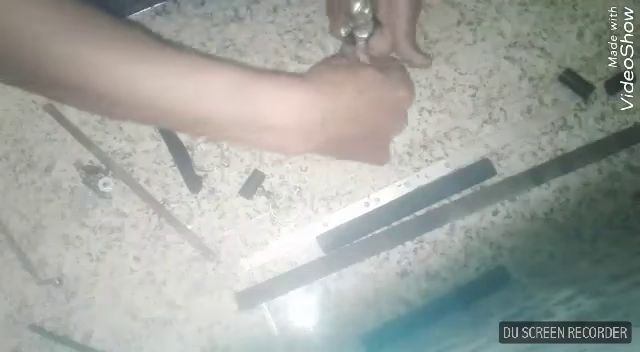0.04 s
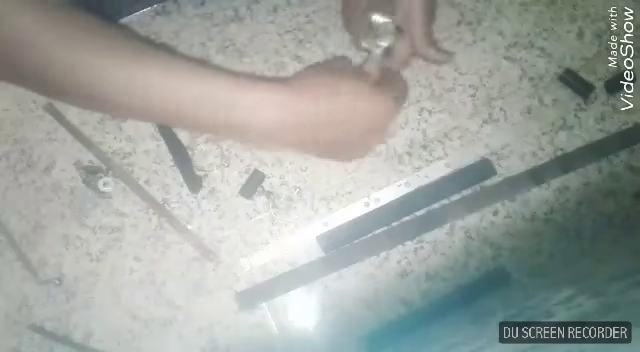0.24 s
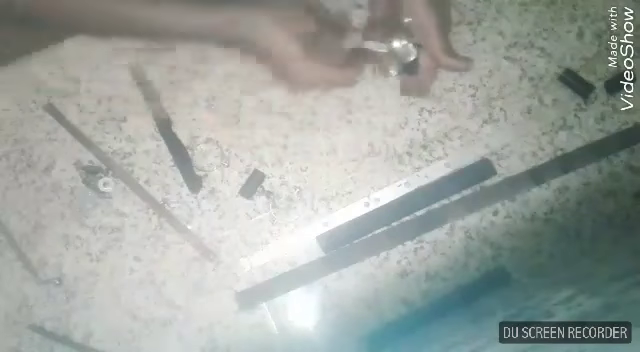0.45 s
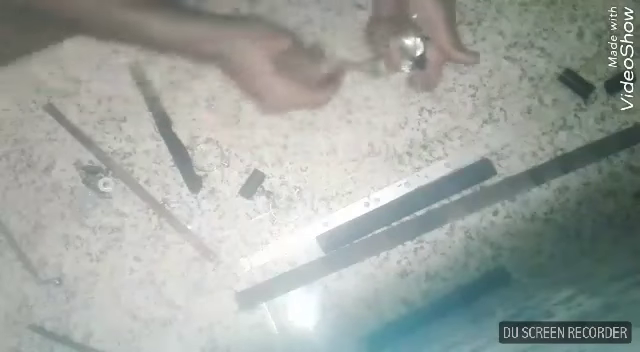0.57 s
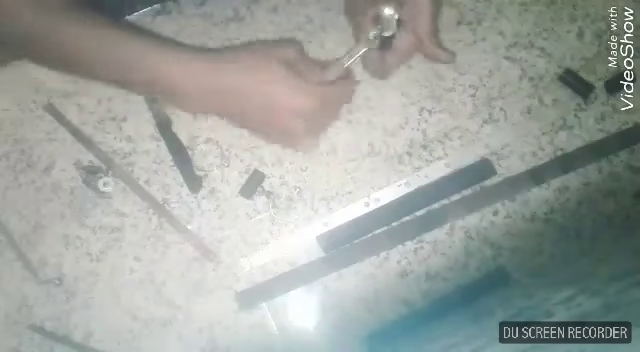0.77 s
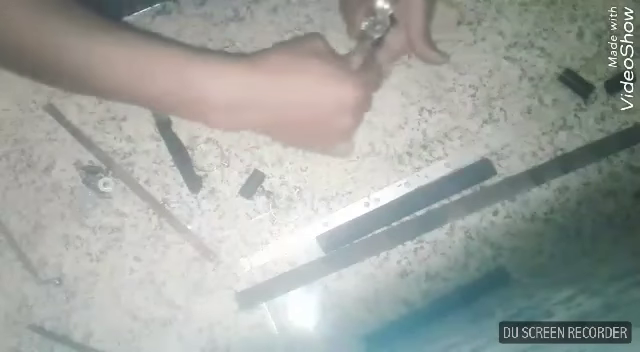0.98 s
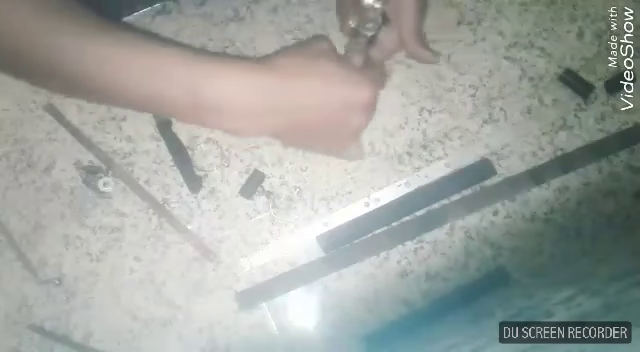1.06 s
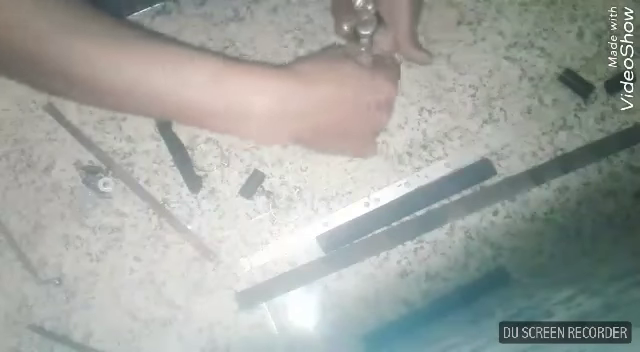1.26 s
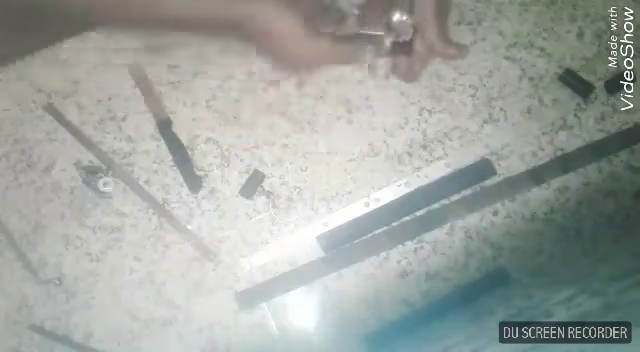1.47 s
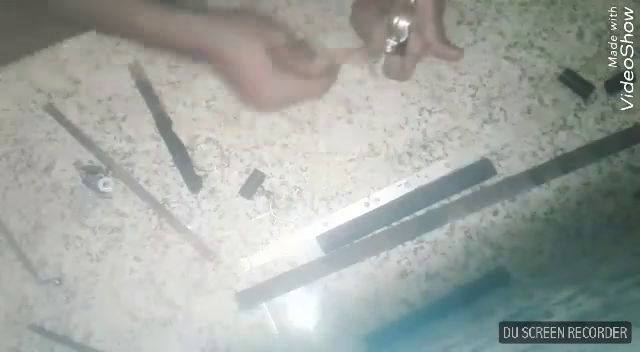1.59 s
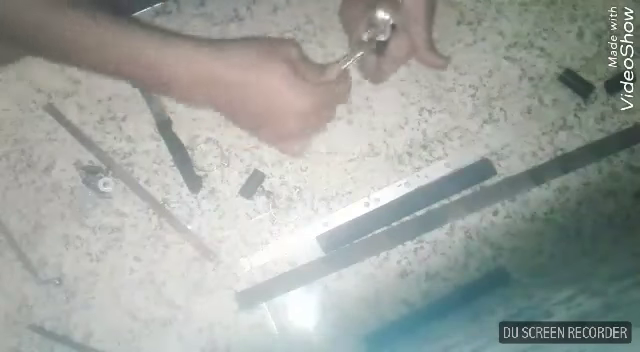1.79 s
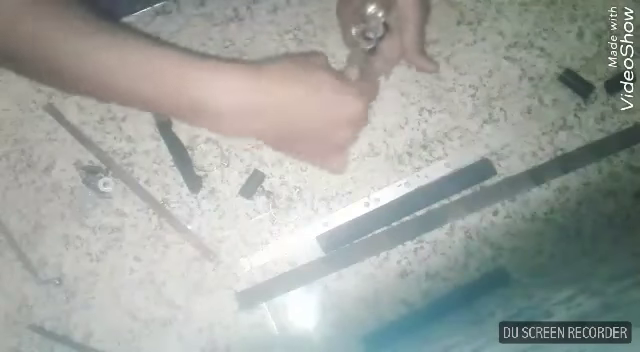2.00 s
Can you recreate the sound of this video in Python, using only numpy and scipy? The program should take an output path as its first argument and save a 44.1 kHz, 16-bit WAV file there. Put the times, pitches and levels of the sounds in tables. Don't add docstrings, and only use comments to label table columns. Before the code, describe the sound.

Steel spanner working a nut on a bracket, in a bare stone-floored room. Near-silent hiss, then two soft clicks at 0.22 and 0.28 s, a very faint tick at 0.49, a sharp bright knock at 0.78. From 1.02 to 1.35 a rough, dulling scrape with slips near 1.14-1.21; faint rub at 1.41. Click at 1.54, heaviest double clank at 1.79, light knock at 1.95. Gated phone sound clips room tails and low rumble.

```python
import sys
import numpy as np
from scipy import signal
from scipy.fft import rfft, irfft, next_fast_len
from scipy.io import wavfile
from scipy.ndimage import uniform_filter1d

SR = 44100
rng = np.random.default_rng(int(sys.argv[2]) if len(sys.argv) > 2 else 0)


def waveform_to_disk(signal):
    frames = np.transpose(np.atleast_2d(signal))
    scaled = np.clip(frames, -1, 1) * 32767
    samples = np.round(scaled).astype(np.int16)
    wavfile.write(sys.argv[1], SR, samples)


def natural_amplitude(level_db):
    exponent = np.asarray(level_db, float) / 20
    return 10 ** exponent


N = 89611
SOFT_RISE_S, SHARP_RISE_S, CLANK_RISE_S = 0.003, 0.0007, 0.0015


def unit(x):
    return x / np.sqrt(np.mean(x ** 2) + 1e-20)


def along(points, f_hz):
    f, value = np.transpose(points)
    return np.interp(np.log(f_hz + 1), np.log(f + 1), value)


def filtered(x, response):
    size = next_fast_len(len(x) + 8192)
    spectrum = rfft(x, size) * response(np.fft.rfftfreq(size, 1 / SR))
    return irfft(spectrum, size)[:len(x)]


def modes(table, f):
    total = 0
    for k, (centre, width, db) in enumerate(table):
        resonance = 1j * f * width / (centre ** 2 - f ** 2 + 1j * f * width)
        total = total + (-1) ** k * natural_amplitude(db) * resonance
    return total


# f/Hz, density/dB per Hz
CRACK_SPECTRUM = [(88, -14), (150, -18), (572, -4), (1000, -23), (1570, -1.5), (1980, -7.5), (6730, -5),
                  (7410, -3.5), (15500, -30)]


def contacts(events, mode_table, rise_s):
    fall_ratio, grain_db, level_trim_db = 1.6, 4.5, 21
    pad = SR // 50
    t = (np.arange(SR) - pad) / SR
    envelope = np.exp(np.where(t < 0, t / rise_s, -t / rise_s / fall_ratio))
    impulse = 1.0 * (t == -pad // 8 / SR)
    out = np.zeros(N + SR)
    for at_s, peak_db, crack_db, tilt_db, wet_db in events:
        grain = unit(uniform_filter1d(rng.standard_normal(SR), size=30))
        scrape = envelope * rng.standard_normal(SR) * natural_amplitude(grain_db * grain)

        def colour(f):
            crack = natural_amplitude(crack_db + along(CRACK_SPECTRUM, f))
            return (modes(mode_table, f) + crack) * natural_amplitude(tilt_db * np.log2((f + 200) / 4000))

        direct = filtered(scrape / np.linalg.norm(scrape), colour)
        blow = filtered(impulse, colour)
        start = round(at_s * SR) - pad
        out[start:start + SR] += natural_amplitude(peak_db + level_trim_db) * (direct + natural_amplitude(wet_db) * room(blow))
    return out[:N]


# f/Hz, width/Hz, level/dB.
SEAT_MODES = [(575, 54, -21), (1574, 160, 4), (3020, 310, -4), (4430, 220, 6.5), (5510, 180, -4),
              (6150, 98, -0.5), (7290, 19, 5), (7800, 180, 0), (10920, 57, -1.5), (11630, 100, -9)]
# t/s, peak level/dB, crack re modes/dB, tilt/dB per octave, room re direct/dB
SEAT_EVENTS = [
    (.2185, -23, -6.5, 0.9, 2.5),
    (.284, -27.5, -1.5, -0.5, 1.5),
    (.4928, -66.5, 3, 11.5, -3),
]


def seating():
    return contacts(SEAT_EVENTS, SEAT_MODES, SOFT_RISE_S)


LIFT_MODES = [(630, 40, -16), (1760, 18, 5.5), (2390, 140, -14), (2600, 34, -3), (2980, 73, -7),
              (4450, 160, -1), (7310, 81, 0.5), (8104, 122, 3.5), (10850, 120, -17.5), (12400, 71, -21),
              (14400, 80, -23)]
LIFT_EVENTS = [
    (.7695, -38, -5, -4, -17),
    (.7787, -13.5, -11, 2.8, -0.5),
]


def lifting():
    return contacts(LIFT_EVENTS, LIFT_MODES, SHARP_RISE_S)


SLIP_MODES = [(1540, 96, -6.5), (3030, 140, 1.5), (4490, 440, -3.5), (6190, 51, 3), (7500, 38, -3.5),
              (8160, 370, -3), (11100, 360, -8.5), (12000, 51, -22)]
SLIP_EVENTS = [
    (1.142, -26, -2, -2.5, 5.1),
    (1.185, -25, -9, 5, 4.6),
    (1.213, -34.5, 2.5, -0.5, 1),
    (1.41, -41, -6, -1.5, 0.24),
]


def slipping():
    return contacts(SLIP_EVENTS, SLIP_MODES, SOFT_RISE_S)


RESEAT_MODES = [(600, 74, -27), (1485, 82, -3), (1760, 55, -18), (3000, 98, -3), (3390, 67, -12),
                (4530, 83, -6.5), (5500, 31, -5), (6230, 62, -20), (7180, 18, 6), (7680, 200, -3),
                (10660, 60, -15)]
RESEAT_EVENTS = [
    (1.539, -22, -5.5, -0.35, 5.76),
]


def reseating():
    return contacts(RESEAT_EVENTS, RESEAT_MODES, SOFT_RISE_S)


CLANK_MODES = [(537, 41, -8.5), (1580, 72, 5), (2600, 210, -20.5), (3300, 220, -2), (4280, 220, -3.5),
               (5800, 830, 0), (6820, 330, -4), (8000, 410, 10), (9070, 240, -2.5), (10800, 1800, -11),
               (12550, 320, 3), (14100, 350, -13)]
CLANK_EVENTS = [
    (1.7865, -17, -6, 1, 6),
    (1.794, -19.5, 2, 1, 0.5),
    (1.949, -38.5, 8.5, -1.1, 0),
]


def clanking():
    return contacts(CLANK_EVENTS, CLANK_MODES, CLANK_RISE_S)


# t/s, level/dB, dullness/0-1
DRAG_PATH = [
    (1.01, -92, 0.1),
    (1.023, -46, 0.88),
    (1.046, -51.5, 0.1),
    (1.09, -43.5, 0),
    (1.14, -58, 0.1),
    (1.241, -50, 1),
    (1.331, -55.5, 0.98),
    (1.388, -71, 0.53),
    (1.414, -52.5, 1),
]
# f/Hz, width/Hz, level/dB
FAST_DRAG_MODES = [(190, 20, -8), (320, 35, -6.5), (595, 19.3, 6.5), (796, 67, 0), (940, 100, -12),
                   (1104, 53, -6), (1255, 52, -13), (2590, 69, -14), (2924, 48, -13), (4130, 330, -11.5),
                   (4630, 210, -17)]
# f/Hz, width/Hz, level/dB
SLOW_DRAG_MODES = [(122.5, 24, -12), (298, 31, -1), (358.5, 22.6, 2.5), (397, 17, -2), (472, 42, -4),
                   (616, 38, -4.5), (823, 51, -8)]
# f/Hz, level/dB
GRIT_SPECTRUM = [(100, -19.5), (700, -19.5), (1300, -21), (3500, -24), (4300, -36.5), (8000, -26),
                 (16000, -54)]


def drag():
    slips_per_s, slip_spread_db, steady_rub_db, wet_db = 460, 1, -20, -2.5
    at_s, level_db, dullness = np.transpose(DRAG_PATH)
    t = np.arange(N) / SR
    dull = np.clip(np.interp(t, at_s, dullness), 0, 1)
    level = natural_amplitude(np.interp(t, at_s, level_db, -120, -120))
    slips = (rng.random(N) < slips_per_s / SR) * natural_amplitude(slip_spread_db * rng.standard_normal(N))
    slips = slips + natural_amplitude(steady_rub_db) * rng.standard_normal(N)
    fast = unit(filtered(slips, lambda f: modes(FAST_DRAG_MODES, f) + natural_amplitude(along(GRIT_SPECTRUM, f))))
    slow = unit(filtered(slips, lambda f: modes(SLOW_DRAG_MODES, f)))
    direct = level * (np.sqrt(1 - dull) * fast + np.sqrt(dull) * slow)
    return direct + natural_amplitude(wet_db) * room(direct)


# f/Hz, t60/s
ROOM_T60 = [(200, 0.91), (1500, 0.79), (6000, 0.63), (12000, 0.4), (16000, 0.17)]


def room(x):
    build_up_s = 0.0028
    f_hz, t, z = signal.stft(rng.standard_normal(SR), SR, nperseg=256)
    decay = natural_amplitude(-60 * t / along(ROOM_T60, f_hz)[:, None])
    tail = signal.istft(z * decay, SR, nperseg=256)[1][:SR]
    tail = tail * (1 - np.exp(-np.arange(SR) / SR / build_up_s))
    return signal.fftconvolve(x, tail / np.linalg.norm(tail))[:len(x)]


# f/Hz, density/dB per Hz
RUMBLE_SPECTRUM = [(30, -13), (80, -9.5), (200, -7.5), (600, -15), (1200, -25.5), (3000, -28)]
# f/Hz, width/Hz, level/dB
RUMBLE_MODES = [(115.3, 5.7, -5), (171, 8.3, 3.5), (324, 12, -15)]


def rumble():
    def colour(f):
        return natural_amplitude(along(RUMBLE_SPECTRUM, f)) + modes(RUMBLE_MODES, f)

    return natural_amplitude(-61) * unit(filtered(rng.standard_normal(N), colour))


# f/Hz, density/dB per Hz
HISS_SPECTRUM = [(18, 13), (30, 7), (279, -8), (335, -10), (424, -9.5), (566, -9), (955, -18),
                 (2040, -13.5), (15800, -27)]


def hiss():
    white = rng.standard_normal(N)
    return natural_amplitude(-72.5) * unit(filtered(white, lambda f: natural_amplitude(along(HISS_SPECTRUM, f))))


GATE_EVENTS = [
    (0.209, 0.395, -1.5, -200),
    (0.492, 0.483, -3.5, -250),
    (.767, 0.92, 2.5, -230),
    (1.006, 1.347, -1, -150),
    (1.392, 1.409, 0.5, -220),
    (1.527, 1.663, -1, -210),
    (1.779, 2.1, 2, -200),
]


def gate_gain():
    shut_db = -20.5
    t = np.arange(N) / SR
    gain_db = np.full(N, shut_db)
    for opens_s, shuts_s, step_db, slope_db_per_s in GATE_EVENTS:
        fall_db = np.maximum(shut_db, step_db + slope_db_per_s * (t - shuts_s))
        gain_db = np.where(t >= opens_s, np.where(t > shuts_s, fall_db, 0), gain_db)
    return uniform_filter1d(natural_amplitude(gain_db), size=130)


MUTE_TIMES = [0.047, 0.207, 0.624, 0.648, 0.673, 0.7613, 1.53]


def mute_gain():
    mute_s = 0.0056
    t = np.arange(N) / SR
    live = np.prod([abs(t - s) > mute_s / 2 for s in MUTE_TIMES], axis=0)
    return uniform_filter1d(live * 1.0, size=40)


def scene():
    spanner = seating() + lifting() + slipping() + reseating() + clanking()
    return (spanner + drag() + rumble())[None]


def top_cut(x):
    return signal.sosfilt(signal.butter(12, 16640, fs=SR, output="sos"), x)


def record(dry):
    low_hz, top_hz, offset = 45, 16100, -0.0004
    x = gate_gain() * dry[0] + hiss()
    x = filtered(x, lambda f: (f < top_hz) * (f / (f - 1j * low_hz)) ** 2)[None]
    mix = x * mute_gain() + offset
    return top_cut(mix)


dry = scene()
out = record(dry)
waveform_to_disk(out)
```